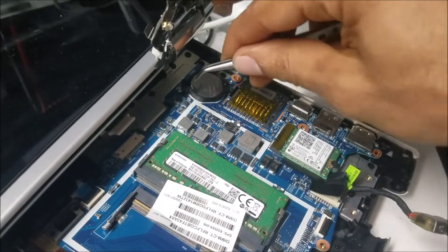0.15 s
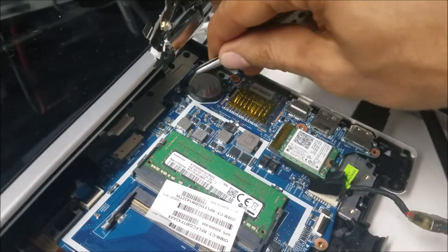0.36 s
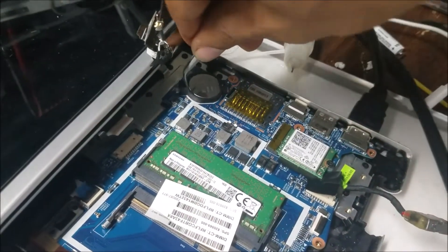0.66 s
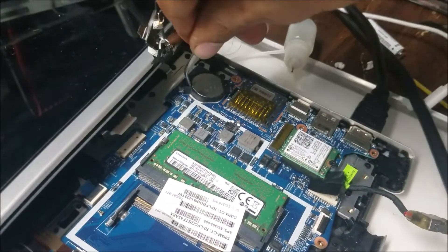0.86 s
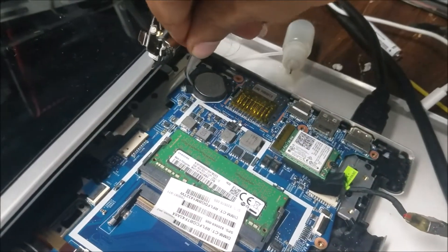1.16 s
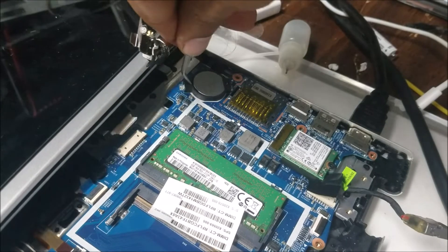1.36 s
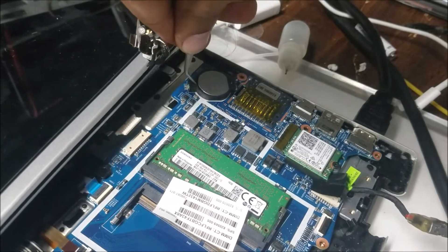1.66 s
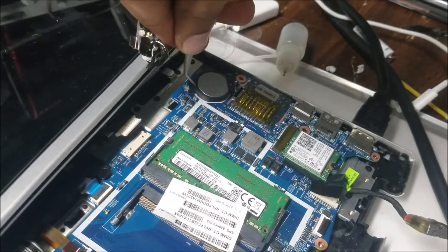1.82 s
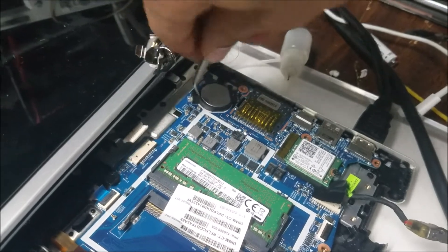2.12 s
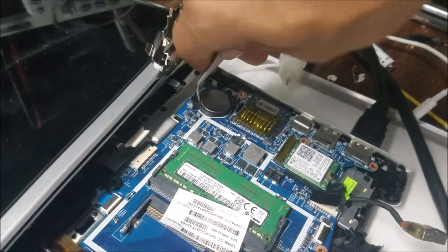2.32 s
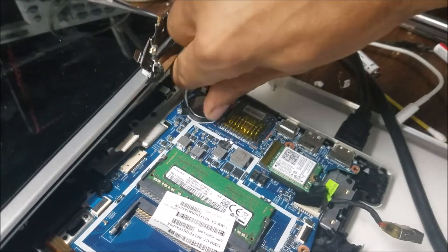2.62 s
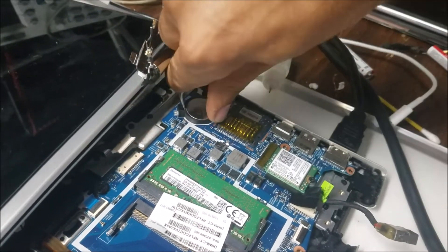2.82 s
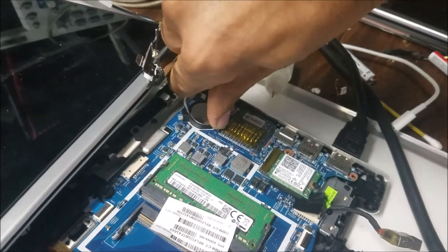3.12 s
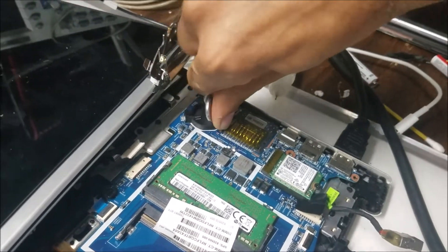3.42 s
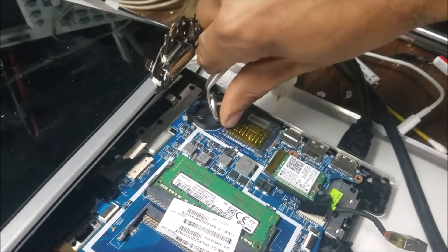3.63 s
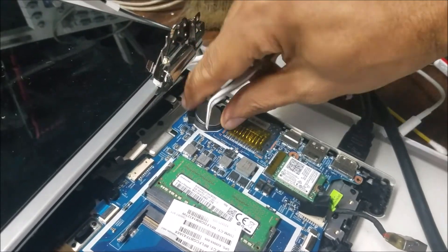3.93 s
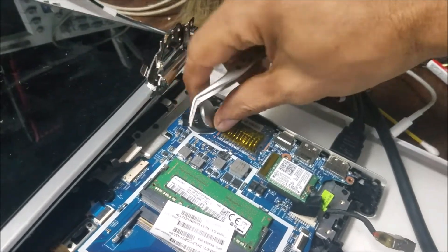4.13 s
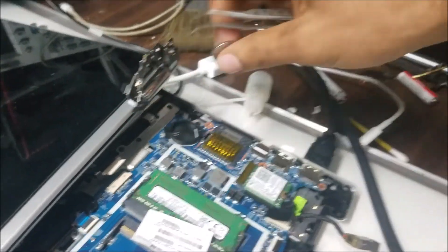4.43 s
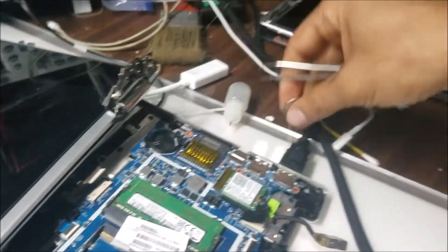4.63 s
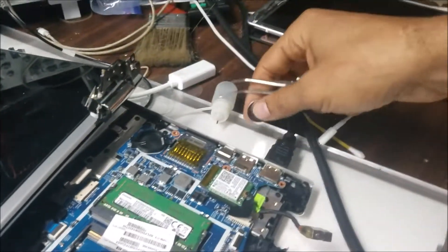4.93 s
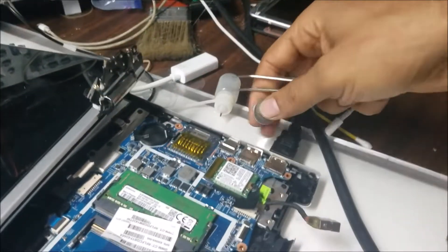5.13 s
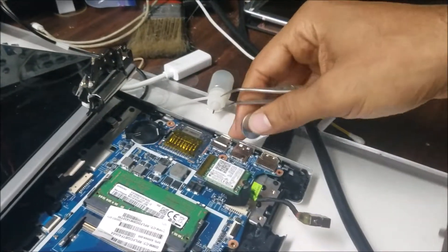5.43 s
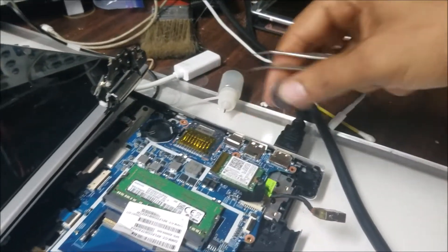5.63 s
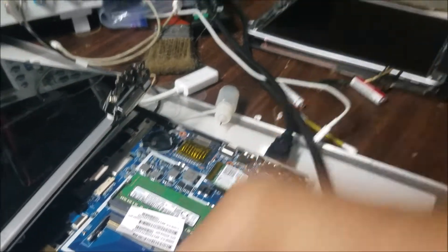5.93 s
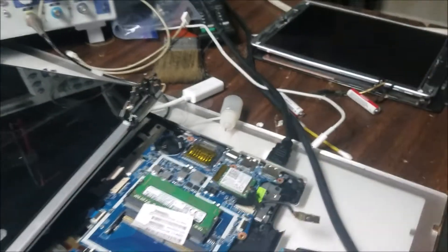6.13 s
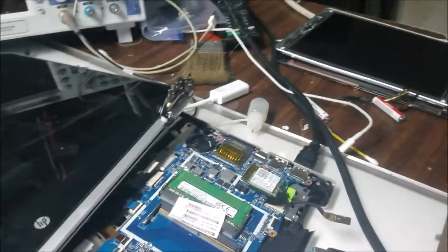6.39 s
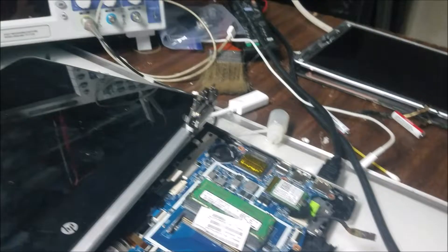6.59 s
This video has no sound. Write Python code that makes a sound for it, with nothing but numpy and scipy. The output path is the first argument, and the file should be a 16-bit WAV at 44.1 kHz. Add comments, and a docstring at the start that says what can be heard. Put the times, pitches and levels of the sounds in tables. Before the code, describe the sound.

Close stereo pickup in a quiet workshop with low rumble and soft fading hiss. Steel tweezers make sparse, faint taps and slips on a laptop circuit board. Midway, a coin battery pops from its plastic holder with a loud hollow snap; fine metallic scraping and a bright click follow. After light taps and a calm gap, a small object clacks and skids on the bench.

```python
"""A quiet workshop rumbles (shaped noise) under a soft, wavering hiss that fades over the first seconds.
Steel tweezers tap, slip and ping at a coin battery on the circuit board of an open laptop: bursts of
tiny contacts make board, case and steel arms ring. At about 3.3 s the battery snaps free: the plastic
holder knocks and a rub sinks in pitch. The tips then slide over its shell as fine shimmering grains,
with more taps. At about 6.3 s something small is put down on the bench with a clack and a short skid."""
import sys
import numpy as np
from scipy import signal
from scipy.fft import rfft, irfft
from scipy.io import wavfile

SR = 44100
rng = np.random.default_rng(int(sys.argv[2]) if len(sys.argv) > 2 else 0)


def file_out(sig):
    """Save sig as 16-bit WAV at sys.argv[1]."""
    # one column per channel
    cols = np.atleast_2d(sig).T
    # limit, then scale
    lim = np.clip(cols, -1, 1)
    pcm = np.round(lim * 32767).astype(np.int16)
    wavfile.write(sys.argv[1], SR, pcm)


N = 298011   # length of the scene [samples]
RING_SIZE = 16384   # length of one short sound [samples]
AGE = np.arange(RING_SIZE) / SR   # time since a short sound began [s]
SIDES = np.array([[1], [-1]])   # left up, right down

# Levels within a colour or a set of ringing tones are relative: the whole sound is levelled afterwards.
# steady background: (frequency [Hz], noise density [dB per Hz])
ROOM_COLOUR = [(12, -54), (20, -31), (22, -28), (37, -8), (74, -6.5), (130, 1), (168, -5), (248, -10.5),
               (337, -13), (367, -16), (513, -23.5), (759, -29.5), (1570, -33.5), (7950, -52.5),
               (16000, -36)]
# how alike the noise is at both microphones: (frequency [Hz], likeness [-1 to 1])
LIKENESS = [(60, 0.93), (130, 0.94), (290, 0.75), (640, 0.19), (1410, -0.1), (3100, 0.032), (6820, -0.0),
            (15000, -0.029)]
# how the noise leans to one side: (frequency [Hz], left minus right [dB])
NOISE_LEAN = [(60, -1), (600, -2.5), (2000, -1), (8000, -0.68), (14000, -2)]
# soft hiss: (frequency [Hz], noise density [dB per Hz])
HISS_COLOUR = [(150, 0), (320, 11), (600, 3.5), (1200, -3), (2200, 3), (3300, -4.5), (5200, -7),
               (7000, -16.5), (12000, -13.5), (16000, -21)]
# course of the hiss, before HISS_GAIN_DB: (time [s], level [dB])
HISS_COURSE = [(0.0, -67), (0.28, -67), (0.73, -63), (1.0, -66), (1.22, -65.5), (1.79, -69.5), (2.28, -66),
               (2.54, -69.5), (3.27, -73.5), (3.65, -69.5), (4.46, -75), (5.95, -75.5), (6.4, -73.5),
               (6.76, -75)]
# put down on the bench, a clack, a scuff and a skid; levels before the thud, bright and tick colouring:
# (time [s], level [dB], thud [dB], bright [dB], tick [dB], slip time [s], loss per catch [dB])
KNOCKS = [(6.297, -28.3, 3, 1.5, 3, .00015, 18), (6.344, -53, 17, 3, -3, .008, 3),
          (6.4012, -37, -1, 3.5, 2, 0.0052, 9.5), (6.4129, -40.5, 1, 3, -1, 0.0041, 7.5)]
# colour of a blow on the bench: (frequency [Hz], level [dB])
BENCH_COLOUR = [(150, -20), (380, -15), (540, -5.5), (750, -11.5), (1050, -5), (1250, -9), (1600, 7.5),
                (2100, 1.5), (3000, -3), (3700, -7), (4400, -6.5), (5500, -17.5), (7500, -25),
                (12500, -20.5), (16000, -36)]
# what the bench rings with: (frequency [Hz], level [dB], time to fall 60 dB [s])
BENCH_MODES = [(1434, -6, 0.068), (1510, 3.5, 0.047), (1642, 4.5, 0.052), (1820, 2, 0.037),
               (2054, -1, .035), (2260, -5, 0.025), (2730, -5, .035), (4340, -1.5, 0.021)]
# the whole laptop is jolted: (time [s], level [dB])
JOLTS = [(1.2169, -45.5), (1.6593, -42.5), (3.2667, -38), (3.294, -41.5)]
# what the laptop rings with when jolted: (frequency [Hz], level [dB], time to fall 60 dB [s])
CASE_MODES = [(30.2, -4, 0.22), (72.6, -2, 0.076), (133.4, 1, 0.25), (194.7, 1, 0.077), (251, 3, 0.012)]
# what the plastic holder rings with: (frequency [Hz], level [dB], time to fall 60 dB [s])
HOLDER_MODES = [(570, -1, .025), (800, -7, 0.038), (950, -5.5, 0.027), (1140, -2, .025), (1613, -1, .045),
                (1770, -2.5, 0.042), (1990, -4, 0.015)]
# the tips slide over the battery's steel shell: (time [s], level [dB])
SLIDE_COURSE = [(3.49, -84), (3.52, -68), (3.6, -77), (3.71, -72), (3.77, -79), (3.83, -90)]
# the tweezer tips spring off an edge, before placing left of centre: (time [s], level [dB])
PINGS = [(0.141, -61), (1.2963, -57), (3.5092, -45.5), (3.569, -56.5)]
# what the steel tips ring with: (frequency [Hz], level [dB], time to fall 60 dB when free [s])
TIP_MODES = [(10550, -16, .012), (12200, 5, .008), (13000, 2, .008), (13400, -5, .03), (14400, -3, .008)]
# what the tweezer arms ring with: (frequency [Hz], level [dB], time to fall 60 dB [s])
ARM_MODES = [(2156, 0, 0.048), (2420, -3, 0.029), (2676, 0, 0.044)]
# tweezers and battery against the board; levels before the thud, bright and tick colouring:
# (time [s], level [dB], thud [dB], bright [dB], tick [dB], slip time [s], loss per catch [dB])
TAPS = [(.142, -45.5, -23, -13, -17, .0005, 22), (.304, -50.5, -18, -12, -11, .004, 6),
        (.339, -53, -7, -6, -6, .0015, 8), (.352, -55, 13, -7, -2, 0.0035, 16),
        (0.3628, -49.5, 0, -4.5, -3, 0.0011, 13), (0.8104, -46.5, 7.5, -0.5, -4.5, .0018, 5),
        (1.2166, -41, -8, 0, 5.5, .001, 7.5), (1.2522, -56.5, 6, 11, 0, 0.0027, 10),
        (1.6543, -40, 2.5, -2, 1.5, 0.0028, 3), (2.052, -49.5, -3, -6.5, -3, .006, 2.5),
        (2.1721, -49, -6, -1.5, 3.5, 0.0019, 18), (2.287, -52, -5, -24, -25, .009, 12),
        (2.9605, -65.5, 5, 6.5, 10.5, 0.00084, 15), (3.0383, -60, 6, 2, 0, 0.00095, 15),
        (3.262, -42.5, 10, 0, -6, .0015, 15), (3.266, -22, 0.5, -4.5, 2, 0.00041, 8.5),
        (3.459, -58, 5, 3.5, -7, 0.013, 5), (3.541, -52.5, 4, -3, -8, 0.0013, 18),
        (3.607, -56.5, -8, -0.5, -8, 0.0023, 16), (3.699, -46.5, -0.5, -13, -11, .0016, 17),
        (3.7107, -43.5, -2.5, -2, -5, 0.00097, 7), (3.8021, -31, -7.5, 3.5, 6, 0.0018, 14),
        (3.8184, -42.5, 3.5, -2, 0, 0.0024, 10), (4.0816, -56, 4, -2.5, -3, 0.0029, 10),
        (4.104, -54, 3, -4, -6, .0016, 15), (4.187, -46, 1.5, -5, -3, 0.0038, 8),
        (4.268, -52.5, -16, -3, -8, .006, 9), (4.2767, -49.5, -17, -3.5, -6, 0.0022, 21)]
# colour of a blow on the board: (frequency [Hz], level [dB])
BOARD_COLOUR = [(100, -12), (180, -1.5), (310, -9.5), (520, 2.5), (730, -11), (930, 0), (1280, -9),
                (1700, -5), (2350, -3.5), (3200, -6), (4100, -5.5), (5600, -9), (7300, -19), (12000, -15.5),
                (16000, -22)]
# what the board and its plastic case ring with: (frequency [Hz], level [dB], time to fall 60 dB [s])
BOARD_MODES = [(490, 1, .055), (569, -1.5, .045), (915, 1, .08), (1158, -10, .08), (1460, -2, .09),
               (1885, 2, 0.057), (2197, -2, 0.1), (2388, 2, 0.045), (2634, -4, 0.083), (2990, -4, 0.077),
               (3946, -6.5, .05), (4490, 5, 0.05), (5360, -7, 0.042), (5990, -10.5, 0.034)]
# where thud, unchanged middle, bright and tick sit: (frequency [Hz]) for each
TONE_HZ = (400, 1600, 4500, 11000)

ROOM_DB, HISS_GAIN_DB, AIR_TOP_HZ = -56.5, 3, 16000
ROOM_T60_S = 0.25   # the room's echo falls by 60 dB in this time
# after each touch the metal catches again a few times, ever later and weaker
CATCH_GAP_S, CATCH_SLOWING, CATCH_JITTER = 0.008, 1.4, 0.08
# the freed battery rubs along its holder: the rub swells and dies while its pitch sinks
RUB_START_S, RUB_SWELL_S, RUB_DB, RUB_HZ, RUB_SAG_OCTAVES_PER_S = 3.284, 0.017, -44.5, 662, 10
# the holder springs back as the battery lets go
RELEASE_S, RELEASE_DB = 3.2658, -28.5
# every tap makes the arms ring briefly, relative to the tap; the fingers damp the hard ones
TWANG_DB, TWANG_MAX_DB = -10, -54.5
CUTOFF_HZ = 16750   # top of what the microphones pass on


def from_db(db):
    """Turn decibels into a factor."""
    return 10 ** (np.asarray(db) / 20)


def unit(x):
    """Scale to energy 1 per channel, on average."""
    return x / np.sqrt(np.mean(np.sum(x ** 2, axis=-1)) + 1e-20)


def at_hz(points, hz):
    """Read a table between its points, on a log-frequency axis."""
    f, value = np.transpose(points)
    return np.interp(np.log(np.maximum(hz, 1)), np.log(f), value)


def causal(spectrum):
    """Filter with this colour that reacts at once (minimum phase): nothing sounds before the blow."""
    level_db = at_hz(spectrum, np.fft.rfftfreq(RING_SIZE, 1 / SR))
    cepstrum = irfft(np.log(from_db(level_db)))
    # folding the second half onto the first moves all the sound after the start
    cepstrum[1:RING_SIZE // 2] *= 2
    cepstrum[RING_SIZE // 2 + 1:] = 0
    return np.exp(rfft(cepstrum))


def fade(t60):
    """Steady dying away, by 60 dB in t60 seconds."""
    return np.exp(-np.log(1000) * AGE / t60)


def pressure(slip_s):
    """The contact swells and dies out as the metal slips; peak about 1, half a slip time in."""
    phase = (AGE + 1 / SR) / (max(slip_s, 2 / SR) / 2)
    return phase * np.exp(1 - phase)


def arrive(x, lead_ms):
    """The sound reaches the left microphone first, so the right one is delayed."""
    hz = np.fft.rfftfreq(RING_SIZE, 1 / SR)
    delay_s = np.array([[0], [lead_ms]]) / 1000
    return irfft(rfft(x) * np.exp(-2j * np.pi * hz * delay_s))


def ring(modes, lead_ms, spread_rad):
    """Dying sine tones; each reaches the two microphones with a phase of its own."""
    turn = spread_rad * rng.standard_normal((len(modes), 1, 1)) * SIDES
    sines = 0
    for k, (hz, db, t60) in enumerate(modes):
        tone = unit(np.sin(2 * np.pi * hz * AGE + turn[k]) * fade(t60))
        sines = sines + from_db(db) * (-1) ** k * tone   # every other tone is turned over
    return unit(arrive(sines, lead_ms))


def add(out, s, sound):
    """Lay a sound in with its far end faded; energy 1 gives 0 dB over a hundredth of a second."""
    start = round(s * SR)
    faded = sound * np.minimum(1, 2 * (1 - AGE / AGE[-1])) ** 2
    out[:, start:start + RING_SIZE] += np.sqrt(SR / 100) * faded[:, :N - start]


def contact(slip_s, catches_per_s=4000):
    """One touch, then tiny random catches while the slip lasts."""
    caught = rng.random(RING_SIZE) < catches_per_s / SR
    force = rng.uniform(-0.97, 1, RING_SIZE) * caught * pressure(slip_s)
    force[0] = 1
    return unit(force)


def catches(loss_db, count=5):
    """A touch and its dying run of catches: (delay [samples], strength)."""
    k = np.arange(count)
    jitter = 1 + CATCH_JITTER * rng.uniform(-1, 1, count)
    delay_s = CATCH_GAP_S * k ** CATCH_SLOWING * jitter
    return list(zip((delay_s * SR).astype(int), from_db(-loss_db * k)))


def repeat(sound, run):
    """Sound the same thing again at each catch of the run."""
    return sum(strength * np.roll(sound, delay) for delay, strength in run)


def wash(slip_s, t60, run=((0, 1),)):
    """Dense ringing that builds up while each contact of the run lasts and then dies."""
    push = pressure(slip_s) ** 2
    pushes = sum(strength ** 2 * np.roll(push, delay) for delay, strength in run)
    power = signal.fftconvolve(pushes, fade(t60) ** 2)[:RING_SIZE]
    return unit(rng.standard_normal((2, RING_SIZE)) * np.sqrt(np.abs(power)))


def blow(row, colour, modes, lead_ms, clatter_db, clatter_t60, modes_db, room_db):
    """A run of contacts sets off a direct crack, the body's dense clatter and clear tones, and the room."""
    _, level_db, thud_db, bright_db, tick_db, slip_s, loss_db = row
    run = catches(loss_db)
    # each catch is a fresh contact
    force = sum(strength * np.roll(contact(slip_s), delay) for delay, strength in run)
    crack = unit(irfft(rfft(arrive(force, lead_ms)) * colour))

    clatter = from_db(clatter_db) * wash(slip_s, clatter_t60, run)
    echo = from_db(room_db) * wash(0.017, ROOM_T60_S, run)
    diffuse = irfft(rfft(clatter + echo) * rfft(unit(irfft(colour))))

    # a longer slip lets the tones build up more slowly
    struck = ring(modes, lead_ms, spread_rad=0.32) * (1 - np.exp(-AGE / max(slip_s, 1 / SR)))
    ringing = from_db(modes_db) * unit(repeat(struck, run))

    tone = causal(list(zip(TONE_HZ, (thud_db, 0, bright_db, tick_db))))
    return from_db(level_db) * irfft(rfft(unit(crack + diffuse + ringing)) * tone)


def air(spectrum):
    """Noise from all around, most alike at both microphones in the bass; middle rms 1."""
    hz = np.fft.rfftfreq(N, 1 / SR)
    mid, side = rfft(rng.standard_normal((2, N)))
    alike = np.clip(at_hz(LIKENESS, hz), -1, 1)
    pair = mid + np.sqrt((1 - alike) / (1 + alike + 1e-3)) * side * SIDES
    colour_db = at_hz(spectrum, hz) + SIDES * at_hz(NOISE_LEAN, hz) / 2
    noise = irfft(pair * (hz < AIR_TOP_HZ) * from_db(colour_db), N)
    return noise / np.std(noise.mean(axis=0))


def rumble():
    """The workshop's quiet rumble: steady noise, strongest in the bass."""
    return from_db(ROOM_DB) * air(ROOM_COLOUR)


def hiss():
    """A soft hiss: coloured noise whose level wavers and sinks."""
    level_db = HISS_GAIN_DB + np.interp(np.arange(N) / SR, *np.transpose(HISS_COURSE))
    return from_db(level_db) * air(HISS_COLOUR)


def bench():
    """A clack and a skid on the bench, further to the left, made of blows that ring its surface."""
    out, colour = np.zeros((2, N)), causal(BENCH_COLOUR)
    for row in KNOCKS:
        knock = blow(row, colour, BENCH_MODES, lead_ms=0.25, clatter_db=0, clatter_t60=0.041,
                     modes_db=1.5, room_db=-12.0)
        add(out, row[0], knock)
    return out * from_db(0.6 * SIDES)


def case():
    """Low thuds of the laptop rocking on the bench: a few deep, dying tones."""
    out = np.zeros((2, N))
    for s, level_db in JOLTS:
        add(out, s, from_db(level_db) * ring(CASE_MODES, lead_ms=0, spread_rad=0))
    return out


def rub(q=9):
    """Friction noise in one narrow band that sinks as the battery slides clear."""
    out = np.zeros((2, N))
    pitch_hz = RUB_HZ * 2 ** (-RUB_SAG_OCTAVES_PER_S * AGE)
    rough = rng.standard_normal(RING_SIZE) + 1j * rng.standard_normal(RING_SIZE)
    slow = signal.butter(2, RUB_HZ / q, fs=SR, output="sos")
    grain = signal.sosfilt(slow, rough)
    # slow noise is carried up to the sinking pitch
    noise = np.real(grain * np.exp(2j * np.pi * np.cumsum(pitch_hz) / SR))
    add(out, RUB_START_S, from_db(RUB_DB) * unit(noise[None] * pressure(2 * RUB_SWELL_S)))
    return out


def holder():
    """A hollow knock of the plastic holder, whose tones die quickly."""
    out = np.zeros((2, N))
    add(out, RELEASE_S, from_db(RELEASE_DB) * ring(HOLDER_MODES, lead_ms=0.09, spread_rad=0.14))
    return out * from_db(1.1 * SIDES)


def slide(catches_per_s=900, damped_t60=0.0035):
    """Fine friction makes the steel tips shimmer; pressed to the shell, they barely ring."""
    s, level_db = np.transpose(SLIDE_COURSE)
    t = np.arange(N) / SR
    grains = rng.standard_normal(N) * (rng.random(N) < catches_per_s / SR)
    damped = ring(TIP_MODES, lead_ms=0.1, spread_rad=0.54) * fade(damped_t60)
    sing = signal.fftconvolve(grains[None], damped, axes=1)[:, :N]
    sliding = (t > s[0]) * (t < s[-1])
    return sing / np.std(sing) * from_db(np.interp(t, s, level_db)) * sliding


def tips():
    """Thin, very high pings of the steel points: a tick of noise and short, clear tones."""
    out = np.zeros((2, N))
    colour = causal([(2000, -12.5), (7000, -12.0), (10000, -2.0), (13000, 3), (16000, -27)])   # (Hz, dB)
    for s, level_db in PINGS:
        diffuse = wash(0.00048, 0.01) + from_db(-12.0) * wash(0.011, ROOM_T60_S)
        tick = from_db(-4.0) * unit(irfft(rfft(diffuse) * colour))
        ping = unit(tick + ring(TIP_MODES, lead_ms=0.087, spread_rad=0.34))
        add(out, s, from_db(level_db) * ping)
    return out * from_db(1.2 * SIDES)


def arms():
    """The short, pitched tick of the sprung steel arms, set ringing by every tap."""
    out = np.zeros((2, N))
    for s, level_db, *_ in TAPS:
        twang_db = min(level_db + TWANG_DB, TWANG_MAX_DB)
        add(out, s, from_db(twang_db) * ring(ARM_MODES, lead_ms=0.099, spread_rad=0.78))
    return out


def board():
    """Taps, slips and the two snaps of the battery, just left of centre: blows that ring the board."""
    out, colour = np.zeros((2, N)), causal(BOARD_COLOUR)
    for row in TAPS:
        tap = blow(row, colour, BOARD_MODES, lead_ms=0.087, clatter_db=2.5, clatter_t60=0.034,
                   modes_db=-0.5, room_db=-15.0)
        add(out, row[0], tap)
    return out * from_db(0.5 * SIDES)


def scene():
    """Handling sounds over the room's rumble and hiss."""
    background = rumble() + hiss()
    laptop = case() + rub() + holder() + board()
    tweezers = slide() + tips() + arms()
    return background + bench() + laptop + tweezers


def record(dry):
    """The left microphone is a little brighter; the top is cut."""
    lean_db = at_hz([(8000, 0), (13000, 2.2)], np.fft.rfftfreq(N, 1 / SR))   # (Hz, dB up left, down right)
    heard = irfft(rfft(dry) * from_db(lean_db * SIDES), N)
    top_cut = signal.ellip(12, 0.2, 80, CUTOFF_HZ, fs=SR, output="sos")
    return signal.sosfilt(top_cut, heard)


dry = scene()
out = record(dry)
file_out(out)
```